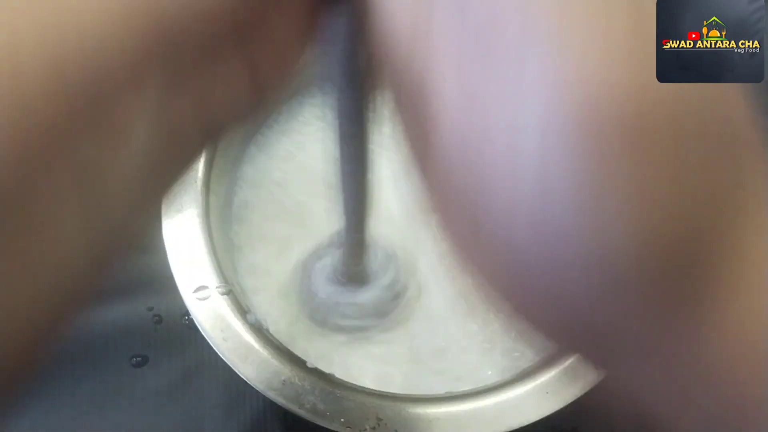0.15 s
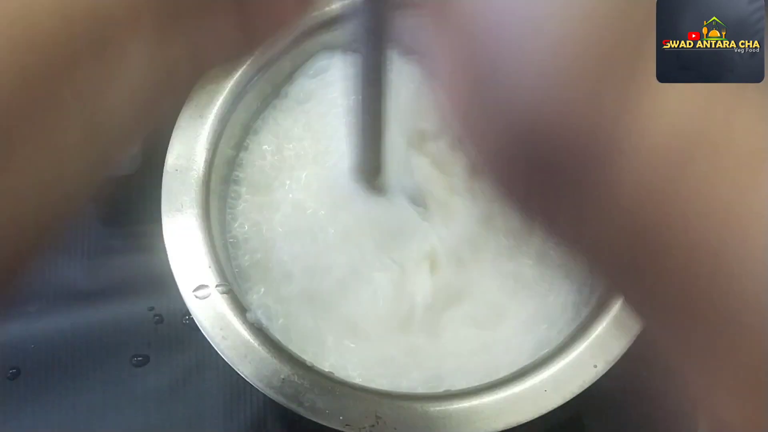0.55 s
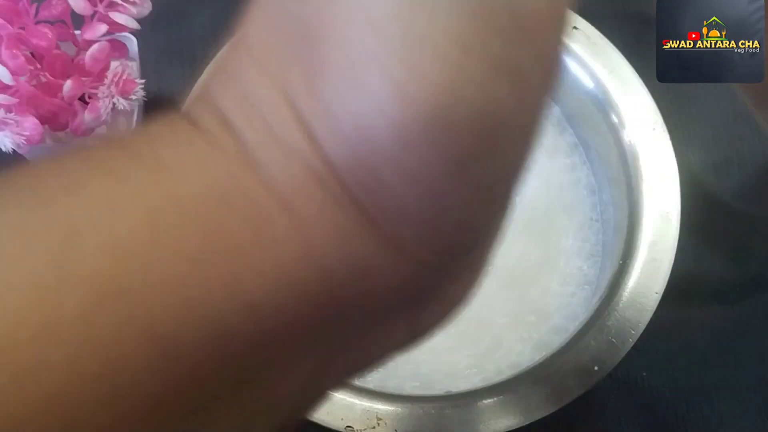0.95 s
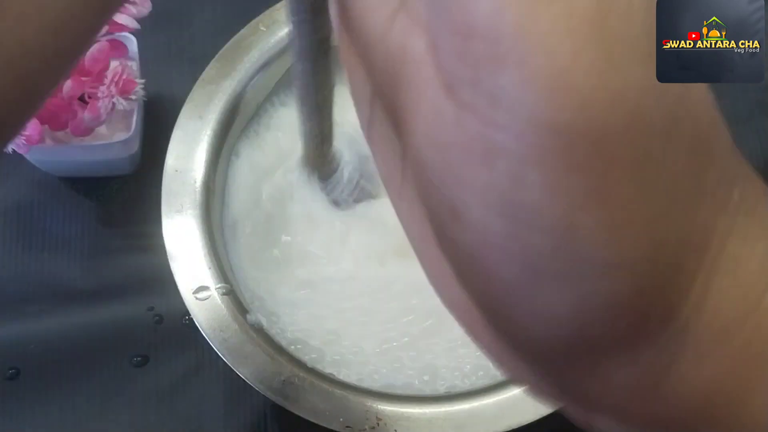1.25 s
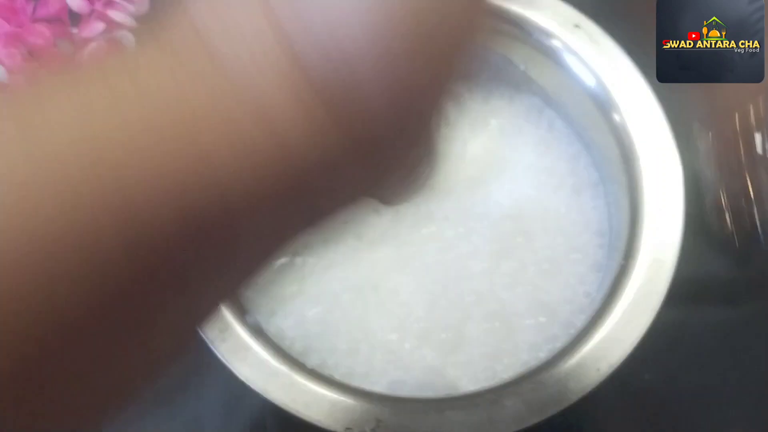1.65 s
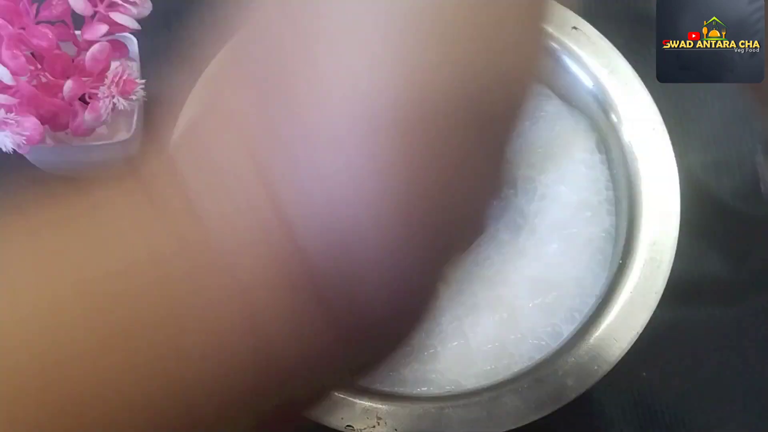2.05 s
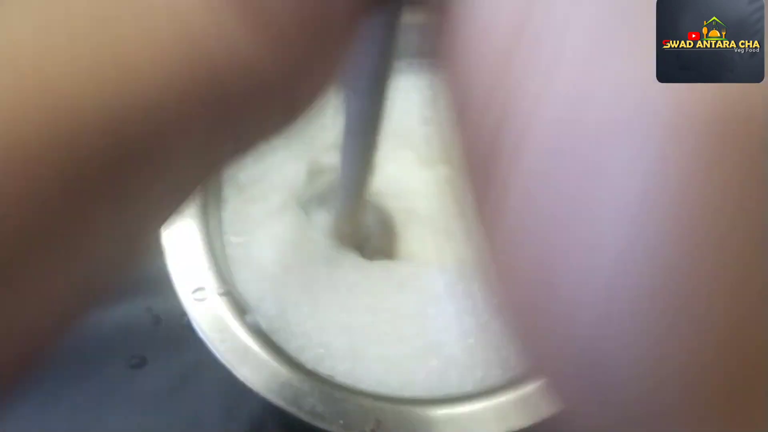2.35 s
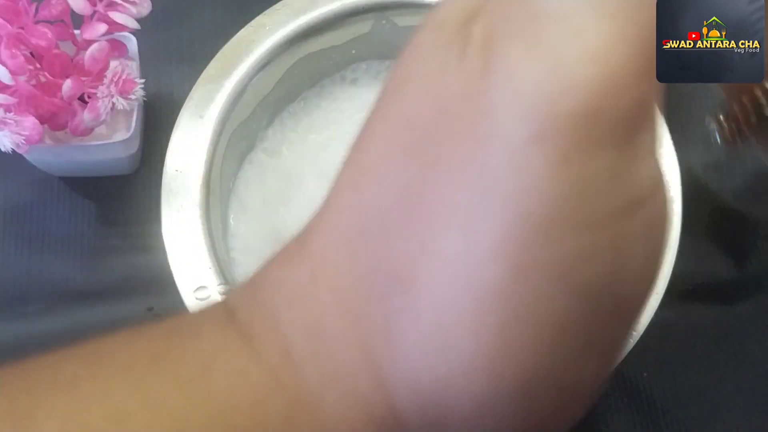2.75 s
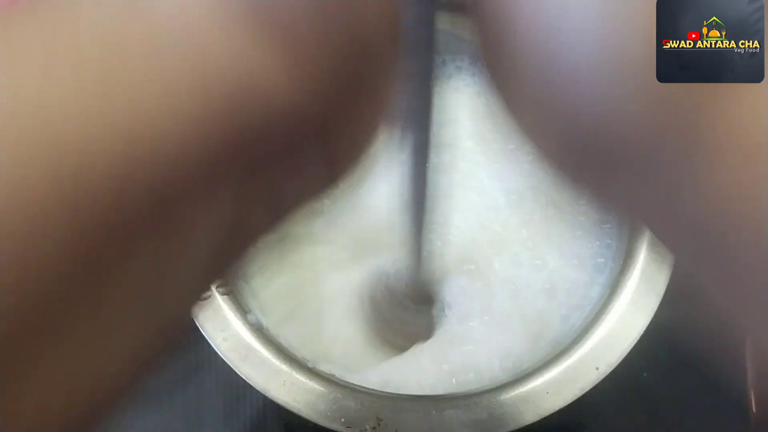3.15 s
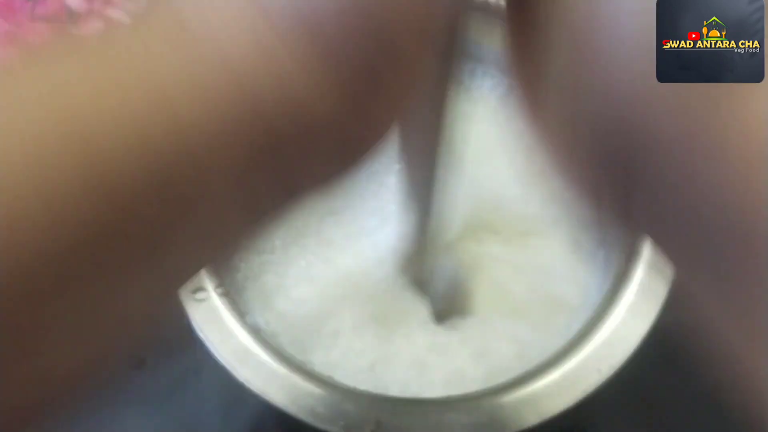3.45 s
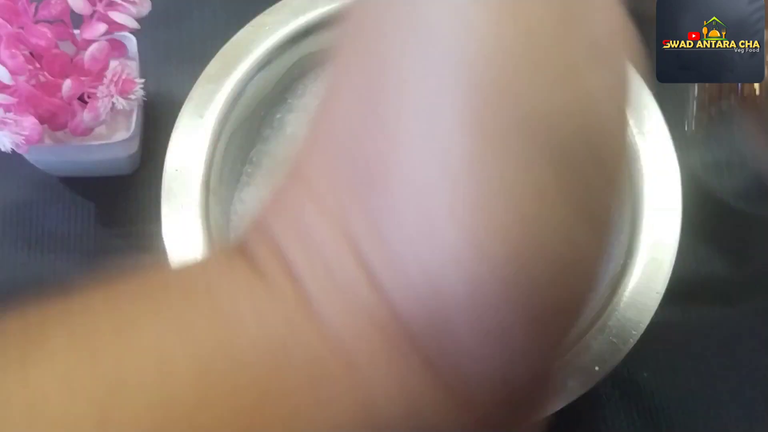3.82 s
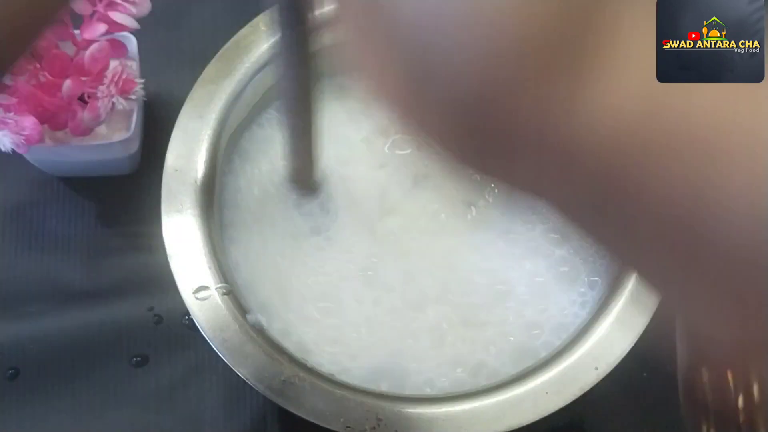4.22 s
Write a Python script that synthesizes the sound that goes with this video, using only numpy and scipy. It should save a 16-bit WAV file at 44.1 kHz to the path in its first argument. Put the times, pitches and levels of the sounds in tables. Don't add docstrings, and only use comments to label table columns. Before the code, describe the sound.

Fast rhythmic scraping and fizzing strokes in a wet metal pot, about three or four a second, punctuated by hard clonks that briefly distort.

```python
import sys
import numpy as np
from scipy import signal
from scipy.io import wavfile
from scipy.ndimage import uniform_filter1d

SR = 44100
rng = np.random.default_rng(int(sys.argv[2]) if len(sys.argv) > 2 else 0)


def bounce(signal):
    frames = np.transpose(np.atleast_2d(signal))
    limited = np.clip(frames, -1, 1)
    pcm = np.round(limited * 32767).astype(np.int16)
    wavfile.write(sys.argv[1], SR, pcm)


def ratio(d):
    e = np.asarray(d, float) / 20
    return 10 ** e


N = 193334

# fastest_s, speeding_up_s, slowing_down_s, froth_db, palms_over_froth_db
STROKES = [(-0.02, .1, 0.24, -56, -30), (0.172, 0.15, 0.16, -38, -7.5), (0.484, 0.18, 0.13, -31, -15),
           (0.767, 0.12, .14, -33.5, -12), (1.067, 0.15, 0.14, -35.5, -10.5), (1.359, 0.13, 0.19, -29, -13),
           (1.648, 0.12, 0.19, -32.5, -12.5), (1.952, 0.14, 0.16, -31.5, -12.5),
           (2.26, 0.23, 0.069, -46, -16), (2.532, 0.12, 0.21, -37.5, -10.5),
           (2.808, 0.12, 0.15, -35.5, -10.5), (3.112, .10, 0.14, -32.5, -19),
           (3.409, 0.16, 0.15, -35.5, -12), (3.688, 0.12, 0.14, -31.5, -15), (3.987, 0.16, .11, -35.5, -15),
           (4.245, 0.14, 0.12, -37.5, -12.5)]
# pitch_hz, width_hz, level_db
BOTTOM = [(530, 49, -5.5), (590.3, 15.6, 2.5), (624.2, 16, 1.5), (679, 180, -4.5), (740, 51, 1),
          (754, 44, 1)]
WALL = [(765, 40, -24), (890, 18, -3), (966, 45.6, -2), (1001.6, 27, -3.5), (1061, 13, 2.5),
        (1058.4, 34.6, 1)]
RIM = [(1260, 40, -4), (1320, 40, -2), (1360, 40, -3), (1470, 60, -5), (1545, 40, -1), (1680, 60, -3),
       (1965, 60, -7), (2200, 120, -11)]
# belly_db, bottom_db, wall_db, rim_db, froth_db, palms_db
REST_DB = (-62.5, -56.5, -60.5, -58.5, -59.5, -76)
TURN_DROP_DB = 34.5
SWISH_SHAPE = 1.71


def rms_one(x):
    return x / np.sqrt(np.mean(x ** 2) + 1e-20)


def evened(x, span_s=0.04):
    span = round(span_s * SR)
    power = uniform_filter1d(uniform_filter1d(x ** 2, size=span), size=span)
    return x / np.sqrt(power + 1e-20)


def drift(rate):
    r = np.exp(-80 * np.pi * rate / SR)
    slow = signal.lfilter([1], [1, -2 * r, r * r], rng.standard_normal(N // 40 + 2002))[2000:]
    return np.interp(np.arange(N) / 40, np.arange(len(slow)), rms_one(slow))


def resonate(x, hz, width_hz):
    r = np.exp(-np.pi * width_hz / SR)
    zeros = np.array([1, 0, -1]) * (1 - r * r) / 2
    poles = [1, -2 * r * np.cos(2 * np.pi * hz / SR), r * r]
    return signal.lfilter(zeros, poles, x)


def bandpass(x, low_hz, high_hz, order):
    return signal.sosfilt(signal.butter(order, [low_hz, high_hz], "band", fs=SR, output="sos"), x)


def grains(per_s, spread_db):
    sizes = ratio(spread_db * np.minimum(rng.exponential(1, N), 4)) * rng.choice([-1, 1], N)
    return sizes * (rng.random(N) < per_s / SR) + 1e-18


def banded(source, spectrum, patchy_db, patch_rate, count):
    hz_points, db_points = np.transpose(spectrum)
    octaves = np.log2(hz_points[-1] / hz_points[0])
    edges = np.geomspace(hz_points[0], hz_points[-1], int(count * octaves) + 1)
    out = 0
    for k, (low, high) in enumerate(zip(edges, edges[1:])):
        level_db = np.interp(np.log(low * high) / 2, np.log(hz_points), db_points)
        flicker_db = patchy_db * drift(patch_rate)
        out = out + bandpass(source[k % 2], low, high, 2) * ratio(level_db + flicker_db)
    return rms_one(out)


def swells(peak_db, lag_s, stretch, drop_db, shape):
    fastest_s, rise_s, fall_s = np.transpose(STROKES)[:3, :, None]
    at = np.arange(0, N + 64, 64)
    t = at / SR - fastest_s - lag_s
    away = np.abs(t) / (stretch * np.where(t < 0, rise_s, fall_s))
    gain = np.sqrt(np.sum(ratio(peak_db - drop_db * away ** shape) ** 2, axis=0))
    return np.interp(np.arange(N), at, gain)


def patches(source, rows, sharpness):
    edge = 3.5
    out = np.zeros(N)
    for s, length, hz, db in rows:
        first, last = round((s - 2 * length) * SR), round((s + 2 * length) * SR)
        at = np.arange(max(first, 0), min(last, N))
        ring = resonate(resonate(source[at], hz, hz / sharpness), hz, 3 * hz / sharpness)
        window = np.exp(-np.abs(2 * (at / SR - s) / length) ** edge)
        out[at] += ratio(db) * evened(ring, 0.027) * window
    return out


def contacts():
    # start_s, peak_db, pitch_hz, belly_db, t60_s
    blows = [(0.001, -7, 530, -8.5, 0.013), (0.272, -1, 556, -7, 0.047), (0.44, -11, 748, -44, 0.024),
             (0.728, 8.5, 942, -19, 0.012), (0.769, -23, 930, -8, 0.036), (1.284, -6.5, 677, -3, 0.077),
             (1.29, 0.5, 810, -42, 0.012), (1.322, -3, 936, -29, 0.13), (1.331, 13.5, 989, -15, 0.034),
             (1.344, -0.5, 838, -53, 0.043), (1.595, -5, 1008, -40.5, 0.07), (1.893, -10, 596, -21, 0.036),
             (1.958, -10, 558, -19, 0.055), (2.584, 7, 594, -12, 0.045), (3.1, 4, 546, -16, 0.041),
             (3.101, -4, 915, -32, 0.081), (3.111, -7.5, 490, -25.5, 0.008), (3.167, -7.5, 533, -3, 0.032),
             (3.511, -0.5, 515, -12, 0.022), (3.597, 0.5, 558, -28.5, 0.066), (4.192, 3, 662, -18.5, 0.021),
             (4.211, 4, 722, -9, 0.037), (4.275, -10, 554, -4, 0.035), (4.307, -4, 546, -12.5, 0.016)]
    # start_s, peak_db, pitch_hz
    light_taps = [(0.088, -18, 1080), (0.239, -15.5, 615), (0.284, -17.5, 722), (0.484, -44, 604),
                  (0.523, -17.5, 800), (0.677, -26, 920), (0.743, -9, 916), (0.801, -26, 655),
                  (0.822, -23, 580), (0.98, -18, 948), (1.052, -14.5, 1001), (1.866, -25, 906),
                  (1.905, -9.5, 567), (2.243, -14, 1037), (2.278, -19, 1310), (2.506, -19, 960),
                  (2.516, -17, 880), (2.62, -9.5, 576), (2.727, -21, 1370), (2.939, -23.5, 513),
                  (3.062, -23, 968), (3.721, -17.5, 542), (3.773, -17.5, 535), (3.884, -22, 740),
                  (4.233, -12.5, 440)]
    taps = [(s, db, hz, -8.5 - 30 * np.log2(hz / 500), 0.049) for s, db, hz in light_taps]
    return sorted(list(blows) + taps)


def skids(centre_hz, belly):
    skid_db, belly_skid_db, reach = -21.5, -15.5, 0.47
    rise_s, t60_s = 0.004, 0.27
    kicks = np.zeros(N) + 1e-18
    for s, peak_db, pitch_hz, contact_belly_db, _ in contacts():
        if belly:
            near = ratio(contact_belly_db + belly_skid_db)
        else:
            near = ratio(skid_db) * np.exp(-(np.log(pitch_hz / centre_hz) / reach) ** 2)
        kicks[round(s * SR)] += ratio(min(peak_db, 3.0)) * near
    eased = np.convolve(kicks, np.hanning(round(rise_s * SR)) * 2 / (rise_s * SR))[:N]
    return signal.lfilter([1], [1, -ratio(-60 / (t60_s * SR))], eased)


def rub(modes, stumbles):
    wander_db = 4.5
    rings = 0
    for k, (hz, width_hz, db) in enumerate(modes):
        driven = stumbles * ratio(db + wander_db * drift(6.55))
        rings = rings + (-1) ** k * resonate(driven, hz, width_hz)
    return evened(bandpass(rings, 0.85 * modes[0][0], 1.15 * modes[-1][0], 3))


def rubbing_head(stumbles):
    # pitch_hz, width_hz, level_db
    belly_modes = [(371, 26, 0), (441, 48, -3), (460, 12, 3.5)]
    # lag_s, pressure_db, lean_bottom_to_wall_db, belly_db, rim_db
    bearing = [(0.039, -42.5, -3, 2.5, -9), (0, -28, -6, -13.5, -8), (0.0049, -24, -1, -51, -6.5),
               (0, -21.5, -1, -21.5, -7.5), (0, -26.5, 1, -45, -11.5), (0, -25, 4.5, -9, -1.5),
               (0.013, -27, 12, -34, -4), (0.0061, -27, -2.5, -26, -1.5), (0.019, -34, 11.5, -40.5, 6),
               (0.033, -25, 4, -22.5, -9), (0, -29, 10, -22.5, 1), (0.00038, -24.5, 5.5, -4.5, -5),
               (0.0064, -30, -5, -8, -3), (0.012, -29, -2.5, -2, 1), (0.0056, -29.5, -7.5, -3, -2.5),
               (0.002, -30, -6, -0.5, -6.5)]
    lag_s, press_db, lean_db, belly_db, rim_db = np.transpose(bearing)[:, :, None]
    families = [(belly_modes, belly_db), (BOTTOM, -lean_db / 2), (WALL, lean_db / 2), (RIM, rim_db)]
    out = 0
    for k, (modes, family_db) in enumerate(families):
        stroke_gain = swells(press_db + family_db, lag_s, 0.91, TURN_DROP_DB, 1.92)
        skid_gain = skids(np.mean(modes, axis=0)[0], belly=k == 0)
        out = out + (stroke_gain + skid_gain + ratio(REST_DB[k])) * rub(modes, stumbles)
    return out


def drags(stumbles):
    # middle_s, length_s, pitch_hz, level_db
    held_spots = [(0.104, 0.077, 544, -27), (0.198, 0.073, 459, -30.5), (0.12, 0.083, 1620, -32.5),
                  (0.412, 0.059, 1468, -26.5), (0.448, 0.038, 1615, -26), (0.502, .05, 547, -24),
                  (0.583, 0.092, 555, -33), (0.745, 0.047, 680, -14), (1.023, 0.18, 1325, -32),
                  (1.116, 0.045, 564, -31), (1.115, 0.051, 1340, -37.5), (1.305, 0.054, 444, -18),
                  (1.396, 0.064, 792, -25), (1.438, 0.11, 1356, -29.5), (1.727, 0.065, 768, -27.5),
                  (2.231, 0.12, 721, -33), (2.677, 0.034, 627, -42), (2.75, 0.047, 1873, -31),
                  (2.88, 0.13, 541, -36), (2.845, 0.12, 1100, -31.5), (2.983, 0.049, 565, -45),
                  (3.143, 0.01, 940, -20.5), (3.349, 0.048, 922, -31), (3.412, .06, 560, -26.5),
                  (3.551, 0.082, 460, -26.5), (3.79, 0.072, 1090, -34.5), (3.877, 0.084, 1956, -38.5),
                  (3.898, .06, 1324, -34.5), (3.966, 0.041, 520, -25.5), (3.64, 0.042, 574, -19)]
    return patches(stumbles, held_spots, sharpness=22)


def knocks():
    reach, body, damping = 0.32, 0.29, 1.37
    belly_hz, contact_s = 385, 0.0012
    out, t = np.zeros(N), np.arange(round(0.15 * SR)) / SR
    hz = np.array(BOTTOM + WALL + RIM)[:, :1]
    mode_rings = np.sin(2 * np.pi * hz * t)
    for s, peak_db, pitch_hz, belly_db, t60_s in contacts():
        chance_db = 3 * rng.standard_normal((len(hz), 1))
        share = np.exp(-(np.log(hz / pitch_hz) / reach) ** 2) * ratio(chance_db)
        ring = np.sin(2 * np.pi * pitch_hz * t) + body * np.sum(share * mode_rings, axis=0) / 2
        ring = ring / np.abs(ring).max() + ratio(belly_db + 2.0) * np.sin(2 * np.pi * belly_hz * t)
        onset = (1 - np.exp(-(t / contact_s) ** 2)) ** 2
        ring = ring * onset * ratio(-60 * (t / max(t60_s, 0.01)) ** damping)
        at = round(s * SR)
        out[at:at + len(t)] += (ring / np.abs(ring).max() * ratio(peak_db))[:N - at]
    return signal.sosfilt(signal.butter(6, 320, "high", fs=SR, output="sos"), out)


def froth(fizz):
    # pitch_hz, density_db_per_hz
    froth_colour = [(2000, -4), (2400, 0), (3000, -2), (3600, -2), (4000, -4), (4450, -5), (4700, -15),
                    (5200, -23), (5700, -21)]
    froth_db = np.transpose(STROKES)[3, :, None]
    bubbles = banded(fizz, froth_colour, patchy_db=4.5, patch_rate=10.0, count=10)
    gain = swells(froth_db, 0, 0.85, TURN_DROP_DB, SWISH_SHAPE) + ratio(REST_DB[4])
    return gain * evened(bubbles)


def splashes(fizz):
    # middle_s, length_s, pitch_hz, level_db
    thrown_froth = [(0.115, 0.052, 4000, -54), (0.407, .06, 2980, -46), (0.795, 0.05, 1840, -29.5),
                    (0.808, 0.033, 3300, -36), (0.934, 0.067, 1710, -46), (1.213, 0.013, 2740, -50),
                    (1.436, 0.049, 3290, -36), (1.606, .03, 6240, -38.5), (1.647, 0.044, 2650, -34.5),
                    (1.70, 0.096, 1680, -39), (1.888, .05, 4630, -44.5), (1.953, 0.047, 2620, -26),
                    (2.02, 0.069, 2420, -36.5), (2.252, 0.068, 1940, -47), (2.277, 0.081, 2750, -46),
                    (2.505, 0.067, 3300, -39.5), (2.744, 0.072, 2590, -37), (2.747, 0.033, 3300, -42),
                    (2.822, 0.21, 3000, -42), (2.899, 0.064, 1830, -40), (2.902, .07, 3440, -47),
                    (3.05, 0.066, 2640, -50), (3.45, .09, 1750, -43.5), (3.674, 0.064, 5700, -42.5),
                    (3.71, 0.062, 3270, -34.5), (3.946, .05, 3700, -47), (3.969, 0.11, 1710, -32),
                    (4.007, .06, 3850, -40.5), (4.026, 0.056, 2270, -41), (4.28, .06, 1970, -42.5)]
    return patches(fizz, thrown_froth, sharpness=6.5)


def palms(fizz):
    # pitch_hz, width_hz
    skin_hz, skin_width_hz = (6500, 1300)
    froth_db, over_froth_db = np.transpose(STROKES)[3:, :, None]
    uneven = fizz * ratio(3.6 * drift(87))
    skin = resonate(resonate(uneven, skin_hz, skin_width_hz), skin_hz, skin_width_hz)
    gain = swells(froth_db + over_froth_db, -0.0044, 0.9, 1.1 * TURN_DROP_DB, SWISH_SHAPE)
    return (gain + ratio(REST_DB[5])) * evened(skin)


def kitchen():
    # pitch_hz, density_db_per_hz
    air_colour = [(70, -33), (100, -27), (200, 8), (350, 17.5), (600, -15.5), (1000, 9.5), (1400, -14),
                  (2400, -27), (3200, -23.5), (4300, -28), (4800, -23), (6500, -24.5), (7300, -12)]
    # pitch_hz, width_hz, level_db (rms)
    hums = [(130.4, 56, -52.5), (202, 11, -54.5)]
    white = rng.standard_normal((2, N))
    out = ratio(-51.5) * banded(white, air_colour, patchy_db=-2.5, patch_rate=10.0, count=4)
    hum_source = rng.standard_normal(N)
    for hz, width_hz, db in hums:
        tone = resonate(resonate(hum_source, hz, width_hz), hz, width_hz)
        out = out + ratio(db) * rms_one(tone)
    return out


def scene():
    clumps_db = 2.5 * drift(40)
    stumbles = grains(1200, spread_db=4.5) * ratio(clumps_db)
    fizz = [grains(5500, spread_db=3.5) * ratio(0.83 * clumps_db) for _ in range(2)]
    pot = rubbing_head(stumbles) + drags(stumbles) + knocks()
    swish = froth(fizz) + splashes(fizz[1]) + palms(fizz[0])
    return (pot + swish + kitchen())[None]


def band_limit(x):
    return signal.sosfilt(signal.butter(12, 15800, fs=SR, output="sos"), x)


def record(dry):
    narrow = signal.sosfilt(signal.ellip(8, 1, 55, 7100, fs=SR, output="sos"), dry)
    mirrored = narrow * np.sin(2 * np.pi * 15600 * np.arange(N) / SR)
    narrow = narrow + ratio(-35) * bandpass(mirrored, 8700, 9500, 4)
    hiss = ratio(-89) * rng.standard_normal(N) + 0.0003
    # cut_s, scrap_from_s, scrap_to_s, full_s
    cut, scrap, again, full = (2.0733, 2.082, 2.0851, 2.098)
    gate_s = [cut, cut + 1 / SR, scrap, again, again + 1 / SR, full]
    gate = np.interp(np.arange(N) / SR, gate_s, [1, 0.01, 0.01, 0.9, 0.1, 1])
    mix = np.clip((narrow + hiss) * gate, -1, 1)
    return band_limit(mix)


dry = scene()
out = record(dry)
bounce(out)
```